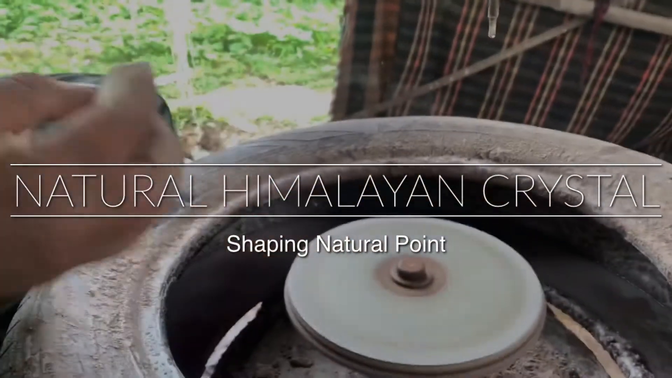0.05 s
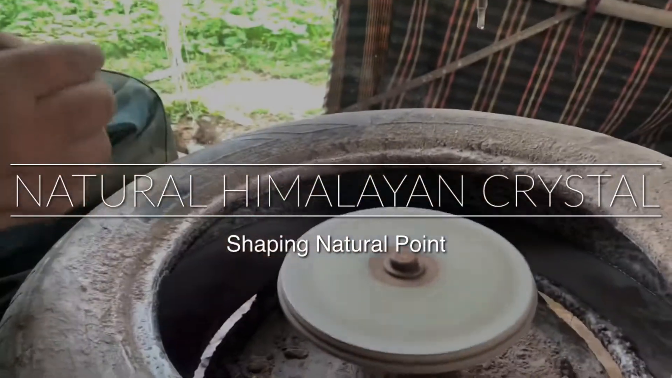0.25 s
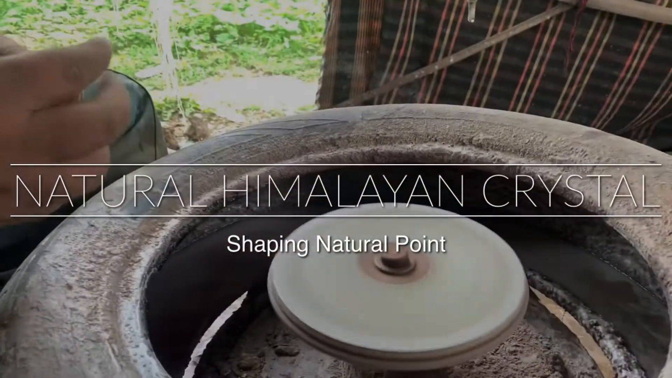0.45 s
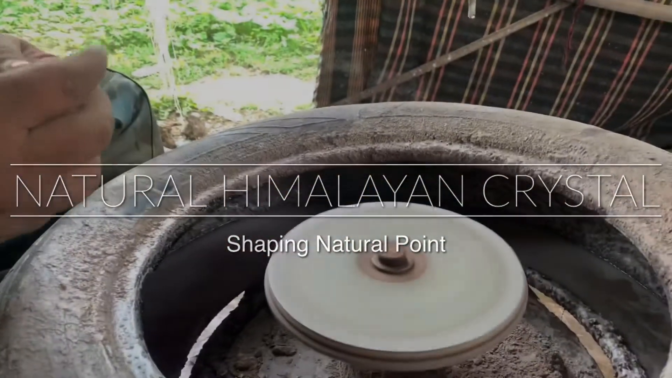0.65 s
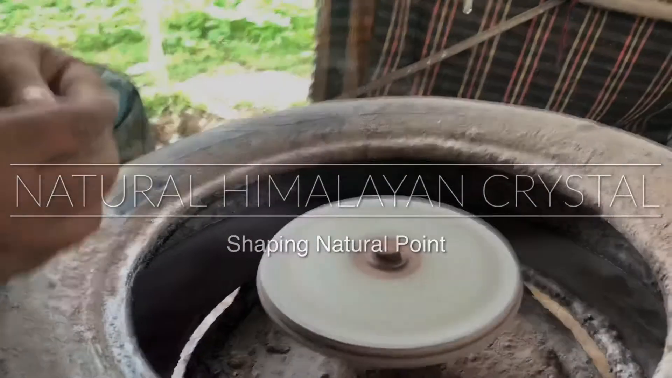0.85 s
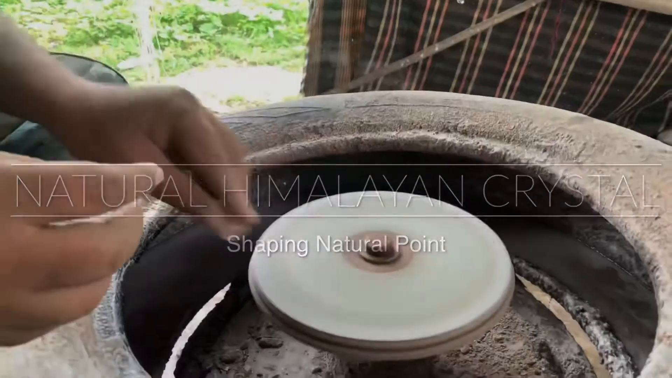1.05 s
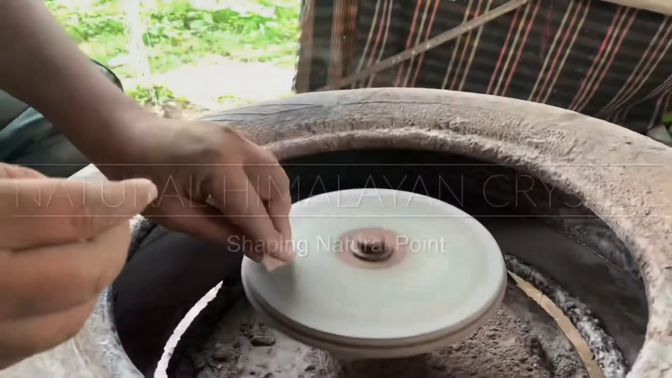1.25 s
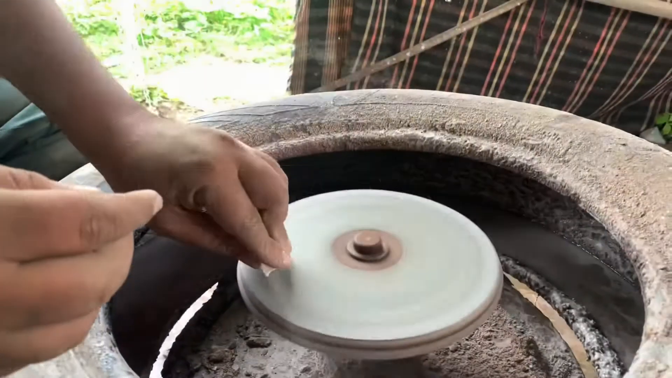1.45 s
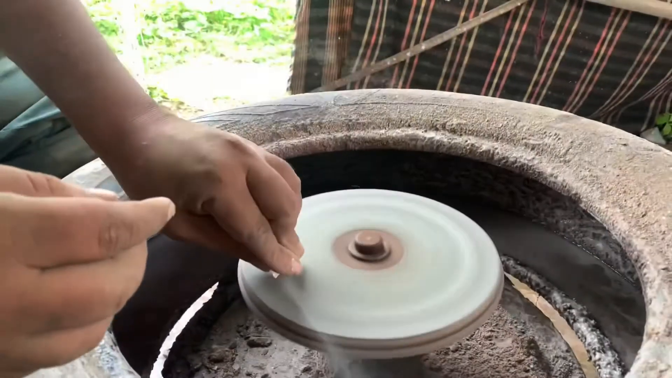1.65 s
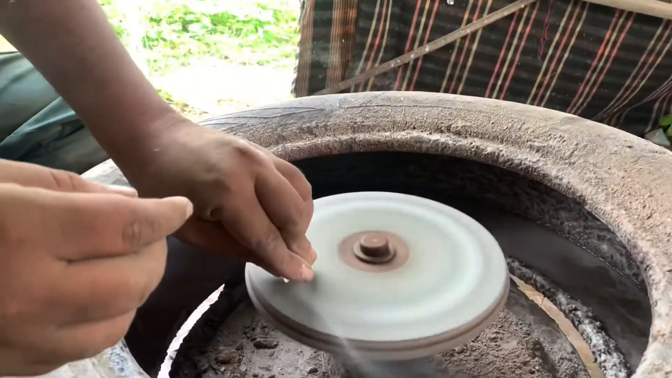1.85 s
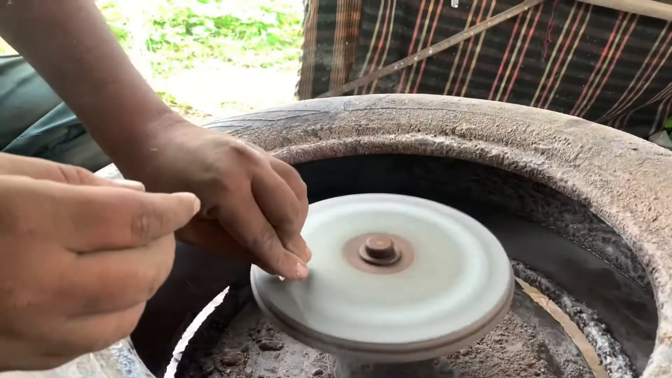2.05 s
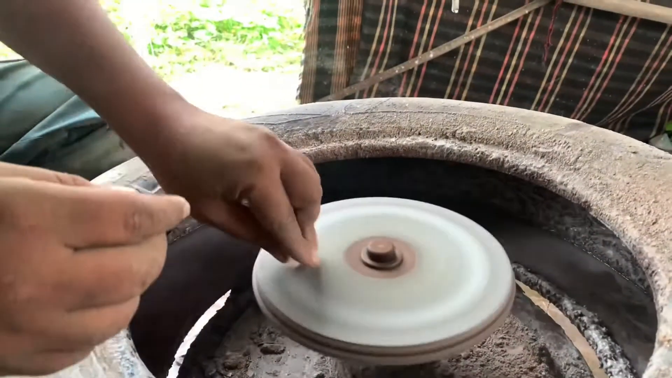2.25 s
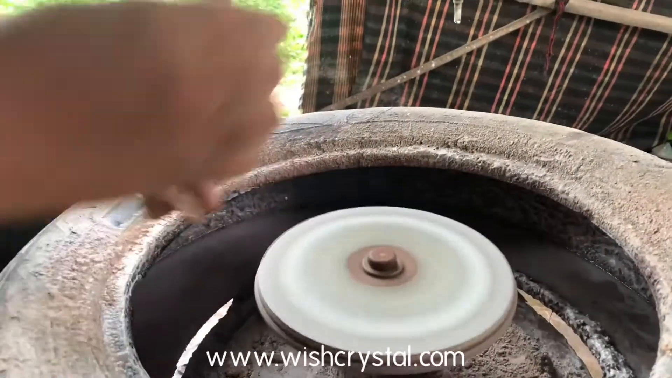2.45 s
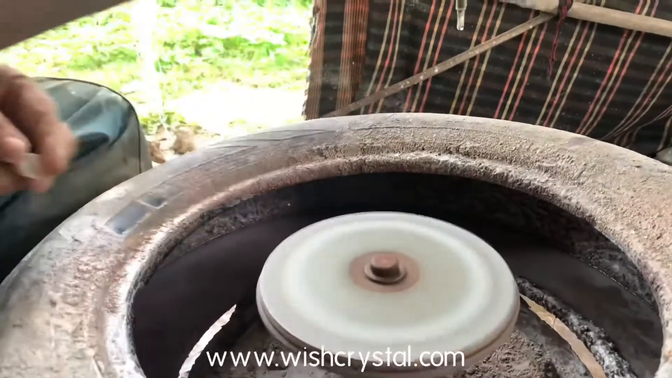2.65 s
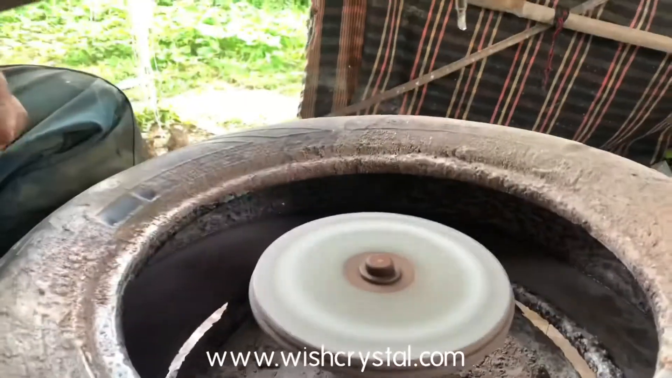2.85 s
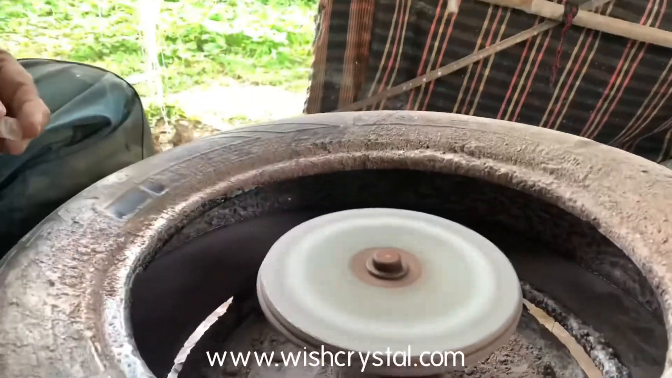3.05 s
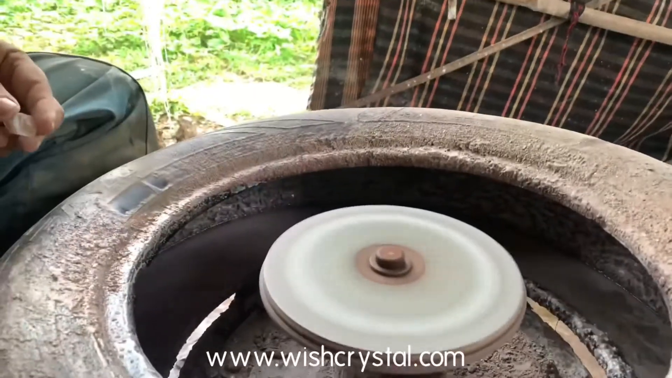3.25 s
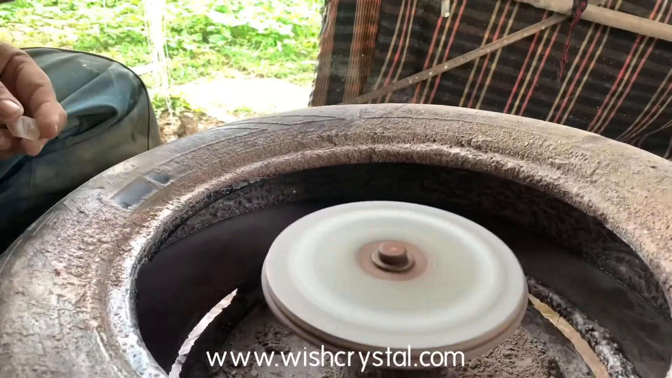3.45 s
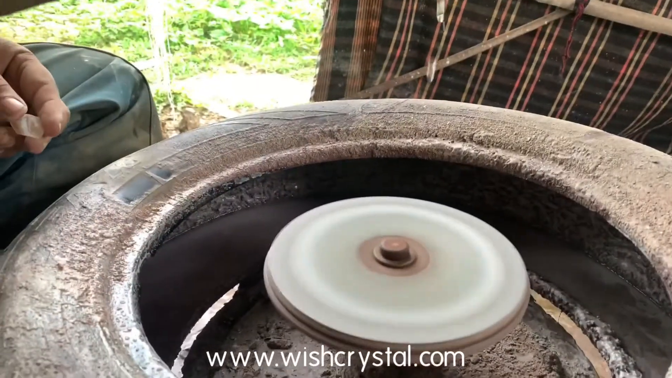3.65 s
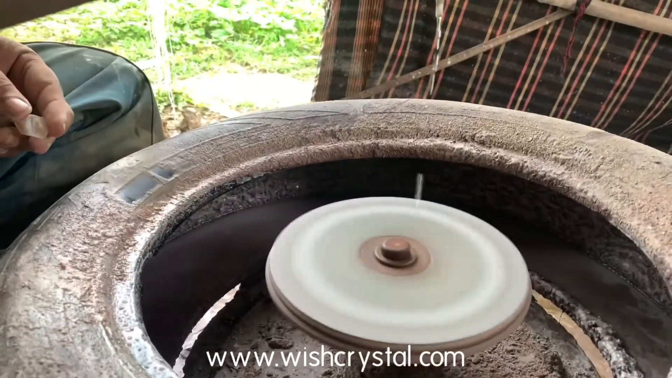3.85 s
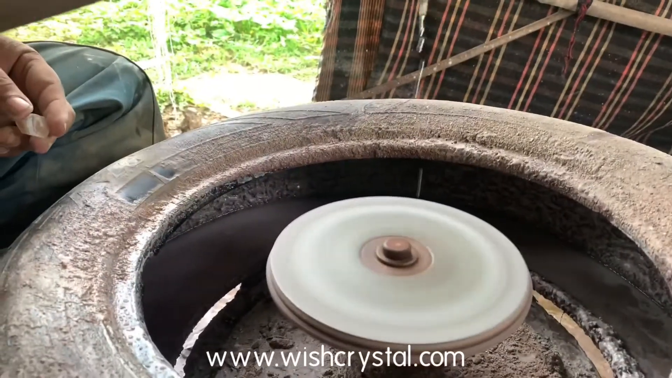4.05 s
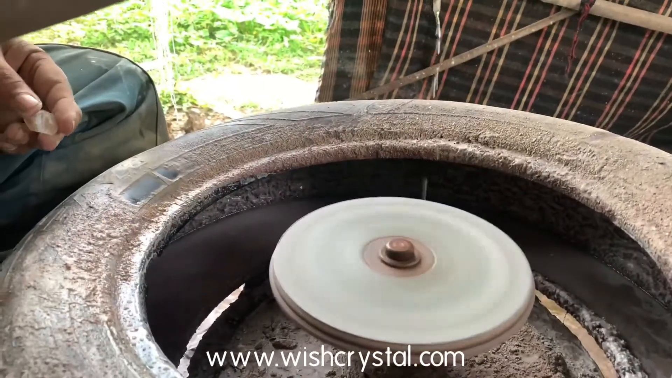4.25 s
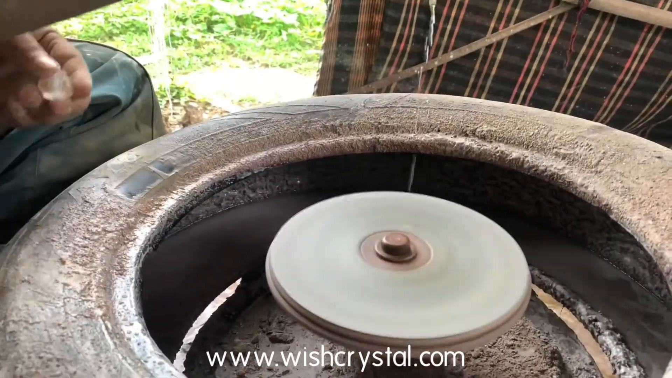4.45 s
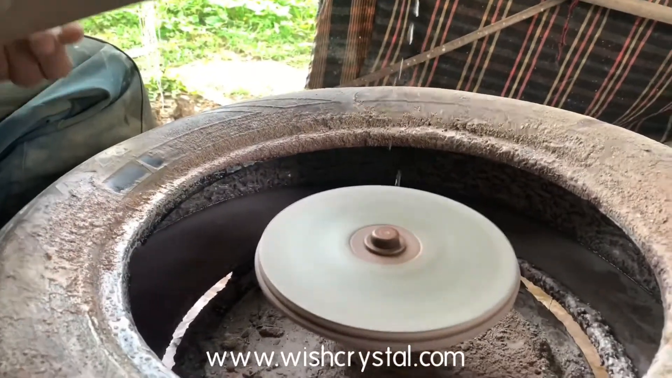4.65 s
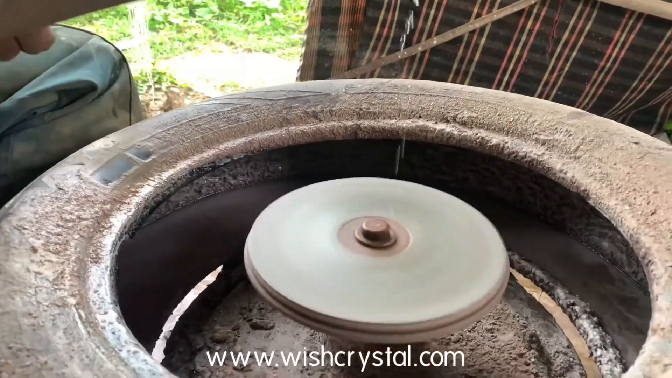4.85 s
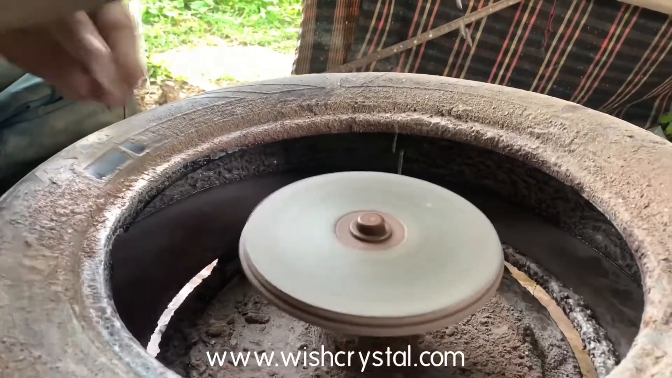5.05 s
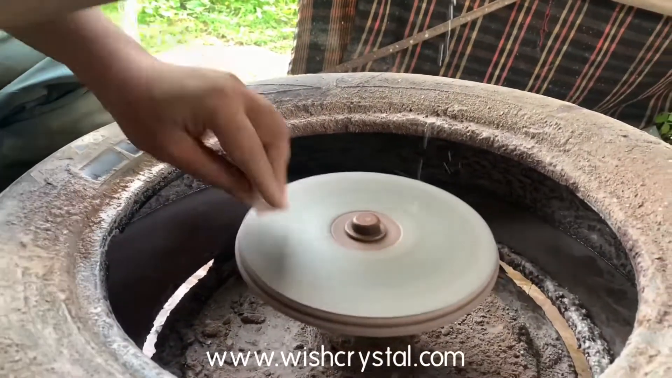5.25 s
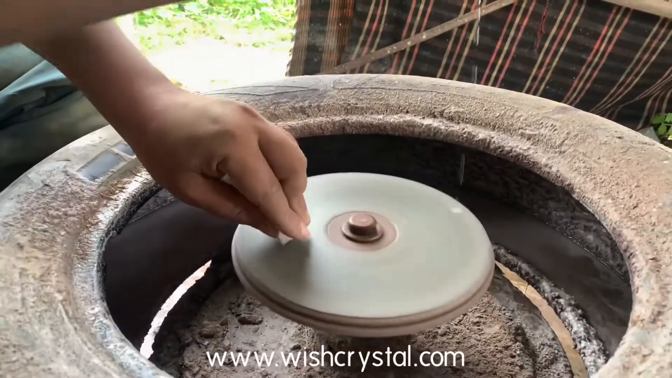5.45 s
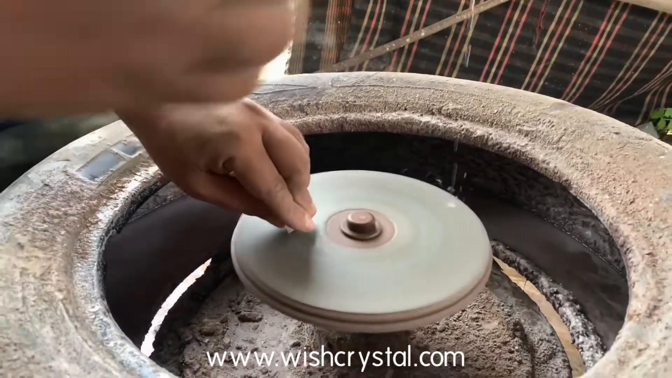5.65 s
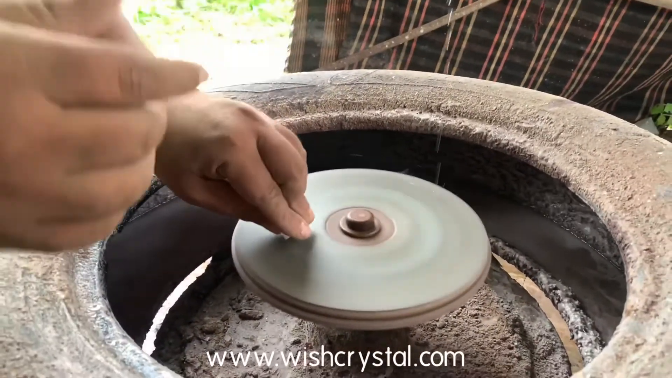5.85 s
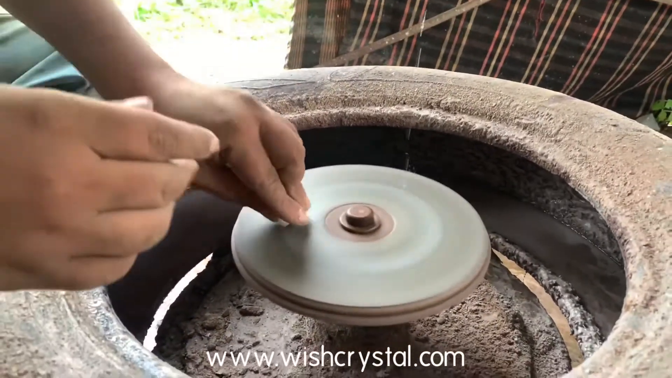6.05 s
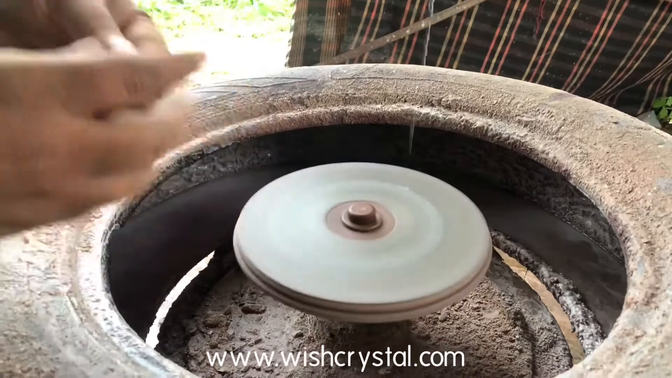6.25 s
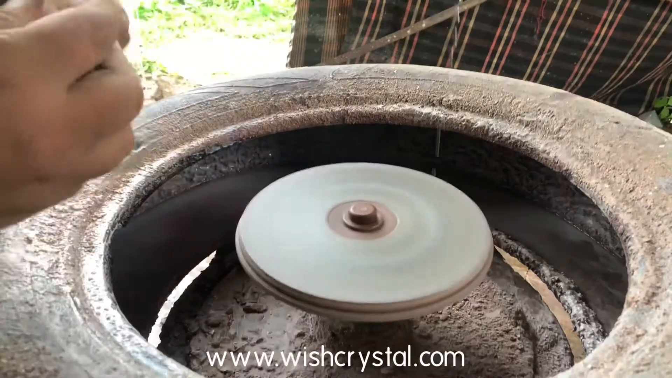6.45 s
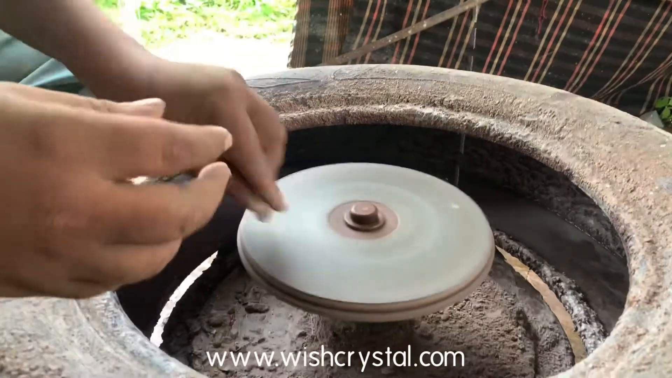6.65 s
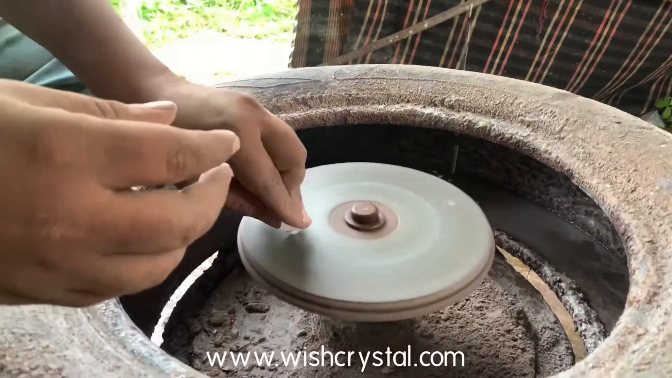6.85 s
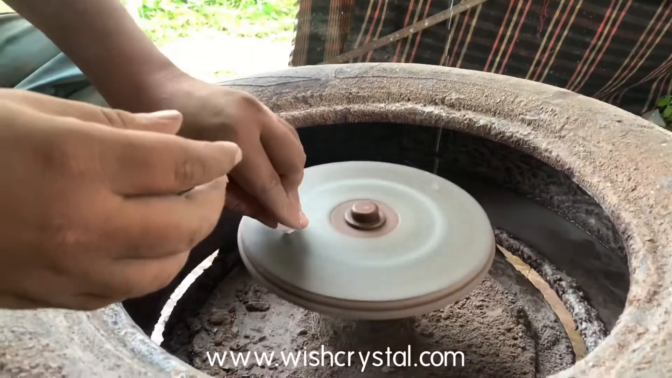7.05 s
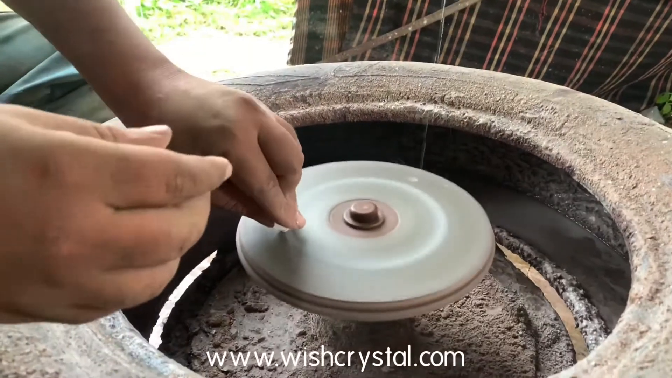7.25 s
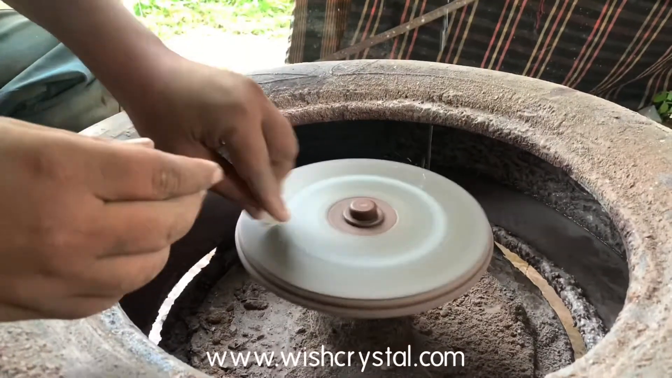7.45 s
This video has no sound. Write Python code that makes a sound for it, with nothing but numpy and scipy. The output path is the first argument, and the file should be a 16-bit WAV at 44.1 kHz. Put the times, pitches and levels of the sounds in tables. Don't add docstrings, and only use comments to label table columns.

```python
import sys
import numpy as np
from scipy import signal
from scipy.fft import rfft, irfft, next_fast_len
from scipy.io import wavfile
from scipy.ndimage import uniform_filter1d

SR = 44100
rng = np.random.default_rng(int(sys.argv[2]) if len(sys.argv) > 2 else 0)


def inscribe(sig):
    pcm = np.round(np.clip(np.atleast_2d(sig).T, -1, 1) * 32767)
    wavfile.write(sys.argv[1], SR, pcm.astype(np.int16))


def convert_level_to_amplitude(level_db):
    exponent = np.asarray(level_db, float) / 20
    return 10 ** exponent


N = 331191
TIME, SIZE = np.arange(N) / SR, next_fast_len(N + 8192)
FREQ = np.arange(SIZE // 2 + 1) * SR / SIZE
TURN_HZ = 38.59
TURN_START = .3

# [touch t/s, full pressure t/s, easing off t/s, lift t/s, pressure level/dB]
PASSES = [
    (1.207, 1.47, 2.08, 2.235, -16.6),
    (5.35, 5.58, 6.02, 6.05, -20.2),
    (6.698, 6.95, 7.37, 7.415, -19.8),
]


def level(x, db):
    return x * convert_level_to_amplitude(db) / np.sqrt(np.mean(x ** 2))


def ring(x, hz, width):
    return signal.lfilter(*signal.iirpeak(min(hz, .45 * SR), hz / width, SR), x)


def walk(rate, size=N):
    hold = int(SR / rate)
    steps = np.repeat(rng.standard_normal(size // hold + 1), hold)
    return 1.42 * uniform_filter1d(uniform_filter1d(steps, hold), hold)[:size]


def grit(count, share, spread_db):
    hit = rng.random((2, count)) < share
    grain = rng.standard_normal((2, count))
    return hit * grain * convert_level_to_amplitude(spread_db * np.minimum(rng.exponential(size=(2, count)), 3.5))


def turn_gate(depth, length, shift):
    since = (TIME * TURN_HZ + shift - TURN_START) % 1
    return 1 + depth * np.exp(-since / length)


def grinding():
    # [f/Hz, width/Hz, pass 1 level/dB, pass 2 level/dB, pass 3 level/dB]
    stone = [(2090, 440, -10, -33, -11.5), (3427, 190, -0.5, -2, -6), (4300, 460, -2.5, -3, -4.5),
             (5020, 320, -6.5, 0.5, -4), (5500, 720, 0.5, -4.5, -1.5), (6690, 320, -2.5, -0.5, -4),
             (8320, 270, -0.5, 0, -2), (9620, 1200, -0.5, -9, -9), (11360, 900, -3, -2.5, -3),
             (3290, 53, -12, -10.5, -6), (3560, 37, -16, -14, -9), (3832, 34, -4, -6.5, -7.5),
             (7020, 90, -9, -7, -16), (7750, 150, -11.5, -10, -10), (2800, 190, -10, -16.5, -15),
             (5495, 24, -20, -21, -20), (6520, 37, -11, -15, -10), (8060, 110, -12, -24, -6),
             (8460, 180, -12, -5, -13), (13200, 1200, -9, -19, -28), (14840, 930, -13.5, -12, -6)]
    grip_shift_db = 1.9
    out = np.zeros((2, N))
    waver = turn_gate(0.35, 0.44, 0.076) * convert_level_to_amplitude(0.76 * walk(30) + 0.21 * walk(12))
    longest = SR * 3 // 2
    for k, row in enumerate(PASSES):
        span = slice(int(row[0] * SR), min(int((row[3] + .11) * SR), N))
        t = TIME[span]
        scratch = grit(SR * 2, .45, 1.8)[:, :longest]
        press_db, tilt = contact(t, *row)
        rock_db, rock_tilt = rocking(t)
        press_db, tilt = press_db + rock_db, tilt + rock_tilt
        body = 0
        for hz, width, *db in stone:
            mode = level(ring(scratch * rng.choice([-1, 1], scratch.shape), hz, width), db[k])
            mode = mode * convert_level_to_amplitude(grip_shift_db * walk(11.1, size=longest))
            body = body + mode[:, :len(t)] * convert_level_to_amplitude(tilt * np.log2(hz / 6000))
        out[:, span] = level(body, 0) * convert_level_to_amplitude(press_db) * waver[span]
    return out


def contact(t, touch, full, ease, lift, db):
    def share(start, end):
        return np.clip((t - start) / (end - start), 0, 1)

    touch_db, touch_s, lean_curve = -18.5, 0.0046, 1.24
    ease_db_per_s, lift_db_per_s = -32, -330
    light = touch_db * (1 - share(touch, full)) ** lean_curve
    leave = ease_db_per_s * np.maximum(t - ease, 0) + lift_db_per_s * np.maximum(t - lift, 0)
    onset = -24 * (1 - share(touch, touch + touch_s))
    brightness = 0.17 - 0.22 * light
    return db + light + leave + onset, brightness


def rocking(t):
    # [t/s, length/s, pressure level/dB, brightness/dB per octave]
    rocks = [(1.215, 0.023, -1, 1.5), (1.384, 0.03, 0.5, 0.5), (1.565, 0.06, -1, 1), (1.72, 0.051, 1.5, -1),
             (1.8, 0.1, 0.5, 2.5), (1.87, 0.029, 1, 1), (1.94, 0.056, 0.5, 1.5), (2.027, 0.078, 1, 0),
             (2.194, 0.13, -2, 1), (5.4, .03, -2, 3), (5.46, 0.053, 4, 0), (5.554, 0.054, 1, 2),
             (5.66, .04, 1, 2), (5.8, 0.054, 1.5, 1), (5.905, 0.026, 0.5, 2), (5.984, 0.03, 0.5, 1),
             (6.812, 0.066, 4.5, -0.5), (6.95, 0.067, 0, -1.5), (7.043, .03, 0.5, 0), (7.07, .015, 0.5, 1),
             (7.186, 0.099, 2, 3), (7.305, 0.058, 1, 2), (7.4, 0.036, -1, 3.5)]
    return sum(np.exp(-((t - s) / length) ** 2) * np.array([[db], [bright]]) for s, length, db, bright in rocks)


def ticks():
    # [t/s, peak level/dB, centre f/Hz]
    drops = [(0.1231, -47, 5010), (0.5637, -28, 10100), (0.5714, -33, 12000), (0.67, -20, 2980),
             (0.9144, -36, 5530), (0.9921, -30, 10800), (1.1109, -48, 6750), (2.3396, -30, 10900),
             (2.3844, -37, 10300), (3.2181, -35, 5070), (3.679, -25.5, 10500), (4.126, -36, 9000),
             (4.58, -36, 9000), (5.349, -38, 11500), (5.3655, -15, 10000), (5.382, -30, 9000),
             (6.7046, -25, 11500)]
    out, t = np.zeros((2, N + 2048)), np.arange(2048) / SR
    shape = np.exp(-t / .002) + .3 * np.exp(-t / 0.014)
    for (s, db, hz), noise in zip(drops, rng.standard_normal((len(drops), 2, 2048))):
        burst = ring(noise * shape, hz, 0.3 * hz)
        start = int(s * SR)
        out[:, start:start + 2048] += convert_level_to_amplitude(db + 1) * burst / np.abs(burst).max()
    return out[:, :N]


def motor():
    angle = 2 * np.pi * (TURN_HZ * TIME - TURN_START - .12) + 0.043 * walk(1.494)
    tones = shaft_hum(angle)
    body = drum_rattle() + rush()
    treble = signal.sosfilt(signal.butter(2, 1900, "high", fs=SR, output="sos"), body)
    bass = signal.sosfilt(signal.butter(2, 330, fs=SR, output="sos"), body)
    thump = .7 * np.cos(angle) * bass
    spray_db, wet_db, drying_s = 0.4, 2, 1.2
    lift = convert_level_to_amplitude(spray_db + wet_db * np.exp(-TIME / drying_s)) - 1
    return tones + body + thump + lift * treble


def shaft_hum(angle):
    # [multiple of the turn rate, rms level/dB]
    shaft = [(1, -66), (2, -52), (3, -53), (4, -73), (5, -58), (6, -44), (7, -52.5), (8, -54)]
    load_db, load_s = -2, 0.33
    pressed = sum(1. * (TIME > row[0]) * (TIME < row[3]) for row in PASSES)
    pressed = uniform_filter1d(pressed, int(load_s * SR))
    tones = 0
    for k, db in shaft:
        strength = np.sqrt(2) * convert_level_to_amplitude(db + load_db * pressed * (k < 4) + 0.72 * walk(4.4))
        tones = tones + strength * np.cos(k * angle + np.array([[0], [k]]))
    return tones


def drum_rattle():
    # [f/Hz, width/Hz, level/dB]
    drum = [(99.4, 7.4, -57), (195.3, 45.4, -41.5), (240.6, 46.4, -43.5), (291, 51, -48.5),
            (417, 25.7, -47), (483, 34, -48.5), (573.6, 62, -49.5), (742.5, 85, -44.5), (804, 54, -40.5),
            (972, 43, -46), (1040, 35, -39), (1127, 146, -45.5), (1278.5, 50, -37.5), (1545, 24, -52.5),
            (1630, 21, -49.5), (1924, 300, -45), (2087, 70, -49), (2253, 73, -46), (2465, 17, -57.5),
            (2660, 140, -54.5), (2830, 59, -50.5), (3261, 95, -45), (3520, 190, -42), (3677, 120, -49),
            (3880, 150, -44.5), (4184, 74, -50.5), (4330, 120, -54.5), (4730, 50, -55.5), (4940, 260, -53)]
    rattle = level(grit(N, .3, 1.45) * turn_gate(1.0, 0.15, .0) * convert_level_to_amplitude(0.13 * walk(20)), 0)
    response = 0
    for k, (hz, width, db) in enumerate(drum):
        loss = 1.5j * width * FREQ
        shape = (loss / (hz ** 2 - FREQ ** 2 + loss)) ** 2
        response = response + shape * convert_level_to_amplitude(db) / np.sqrt(np.mean(np.abs(shape) ** 2)) * (-1) ** k
    return irfft(rfft(rattle, SIZE) * response)[:, :N]


def rush():
    # [f/Hz, level/dB per Hz]
    rush_colour = [(30, -24), (70, -20), (150, -12), (360, -22.5), (650, -10.5), (1400, -3.5), (2900, -12),
                   (4300, -17), (5200, -15), (6000, -25.5), (7100, -22.5), (7700, -29), (8300, -22),
                   (10500, -29.5), (13000, -33.5), (16000, -37.5)]
    hz, db = np.transpose(rush_colour)
    colour = convert_level_to_amplitude(np.interp(np.log(FREQ + 1), np.log(hz), db, left=-40))
    spray = grit(N, .4, 1.0) * turn_gate(0.99, 0.3, 0.014) * convert_level_to_amplitude(0.52 * walk(12))
    return level(irfft(rfft(spray, SIZE) * colour)[:, :N], -35)


def stereo_pair(paths):
    # [f/Hz, half turns by which right leads]
    right_lead = [(2250, 0), (2600, -0.5), (3200, -0.6), (3500, -0.76), (4400, -.4), (5450, -1),
                  (6300, -1.87), (7100, -1.47), (7600, -1.475), (8600, -1), (9500, -0.59), (10200, -0.3),
                  (10500, 0.2), (11500, 0.18), (12700, 0.75), (13300, 0.97), (15850, 2.03)]
    # [f/Hz, likeness 0-1 where left and right are in phase or opposed]
    pair_alike = [(30, .7), (60, .93), (200, 1), (450, 0.72), (1400, 0.74), (1850, 0.06), (2250, 0.68),
                  (5400, 0.75), (6300, 0.5), (7400, 0.5), (8450, 0.87), (10500, 0.86)]
    # [f/Hz, left minus right level/dB]
    pair_gap = [(0, -.3), (400, 0), (1300, 2.8), (2250, .2), (2600, -2), (4900, -3), (5400, -1.5),
                (7300, 0)]
    lead, alike, gap_db = (np.interp(FREQ, *np.transpose(c)) for c in (right_lead, pair_alike, pair_gap))
    lead = np.pi * lead - .9 * np.sin(2 * np.pi * lead) / 2
    alike = np.clip(alike, 0, 1) * (1 - .5 * np.sin(lead) ** 2)
    side = np.array([[1], [-1]])
    wall = rfft(rng.standard_normal((2, 2048)) * np.exp(-np.arange(2048) / SR / .007), SIZE)
    ripple = level(np.abs(wall), -18) * np.exp(1j * np.angle(wall)) * (FREQ > 1500)
    direct, scattered = rfft(paths, SIZE) * (1 + ripple)
    both = np.sqrt((1 + alike) / 2) * direct + side * np.sqrt((1 - alike) / 2) * scattered
    return irfft(both * np.exp(-.5j * side * lead) * convert_level_to_amplitude(side * gap_db / 2))[:, :N]


def scene():
    return stereo_pair(motor() + grinding() + ticks())


def gain_db():
    # [t/s, new gain level/dB, glide/s]
    gain = [
        (1.34, -3.5, 0.11),
        (1.483, -7, 0.0079),
        (1.743, -10, 0.0081),
        (2.2, -11.5, 0.067),
        (2.78, -3, 0.08),
        (5.61, -6, 0.01),
        (6.05, -7.5, 0.086),
        (6.645, -3, .02),
        (7.07, -6.5, 0.0088),
    ]
    start_db = 0.55
    held = [start_db] + [db for _, db, _ in gain]
    out = start_db
    for (s, db, glide), old in zip(gain, held):
        out = out + (db - old) * np.clip((TIME - s) / glide, 0, 1)
    return out


def joint_stereo(x):
    # [f/Hz, level/dB]
    dead_zone = [(1100, -30), (1600, -21), (2200, -16), (5000, -16), (5500, -11), (6300, -12), (7300, -9),
                 (9000, -10), (12000, -9), (14000, -1), (16000, 0)]
    # [f/Hz, level/dB]
    quiet = [(2000, -40), (5000, -20), (5400, -14.5), (6000, -17), (6500, -27), (7300, -22), (7600, -19.5),
             (8300, -19.5), (9400, -20), (10500, -29), (13000, -28), (14000, -24), (14700, -26),
             (16000, -24.5)]
    partner_db, top_hz = -7.5, 15800
    count = N // 1024 + 2
    pair = np.array([x[0] + x[1], x[0] - x[1]])
    pair = np.pad(pair, ((0, 0), (1412, 1024 * (count + 1) - N - 1412))) / 2
    n, k = np.arange(2048)[:, None] + .5, np.arange(768) + .5
    basis = np.sin(np.pi * n / 2048) * np.cos(np.pi / 1024 * (n + 512) * k) / np.sqrt(512)
    blocks = pair.reshape(2, -1, 1024)
    lines = np.concatenate([blocks[:, :-1], blocks[:, 1:]], axis=2) @ basis
    hz = k * SR / 2048

    def band_power(values, width):
        return np.repeat(values.reshape(2, count, -1, width).mean(axis=3), width, axis=2)

    power = band_power(lines ** 2, 8)
    budget = convert_level_to_amplitude(3 * np.repeat(rng.standard_normal((2, count, 24)), 32, axis=2))
    zone = power.max(axis=0) * convert_level_to_amplitude(2 * np.interp(hz, *np.transpose(dead_zone))) * budget
    zone[0] *= convert_level_to_amplitude(2 * 7.5 * (hz > 7200) * (hz < 9500))
    wide, middle = band_power(power, 32), band_power(power, 16)
    power = np.where(hz > 7580, wide, np.where(hz > 4900, middle, power))
    heard = power > power[::-1] * convert_level_to_amplitude(2 * (partner_db - 3 * (hz < 8260))) * budget
    heard |= hz < 4900
    mean_power = power.mean(axis=(0, 2), keepdims=True)
    heard &= power > mean_power * convert_level_to_amplitude(2 * np.interp(hz, *np.transpose(quiet))) * budget
    top = power[:, :, hz > 9500].sum(axis=(0, 2))
    sharp = (top > 2.3 * np.maximum(np.roll(top, 2), np.roll(top, -2)))[:, None]
    kept = ((lines ** 2 > zone) & heard) | sharp
    frames = (lines * kept * (hz < top_hz)) @ basis.T
    blocks = frames[:, 1:, :1024] + frames[:, :-1, 1024:]
    mid, side = blocks.reshape(2, -1)[:, 388:388 + N]
    return np.array([mid + side, mid - side])


def top_cut(x):
    return signal.sosfilt(signal.butter(12, 16850, fs=SR, output="sos"), x)


def record(dry):
    held = .5 * np.tanh(2 * dry * convert_level_to_amplitude(gain_db()))
    mix = joint_stereo(held)
    return top_cut(mix)


dry = scene()
out = record(dry)
inscribe(out)
```